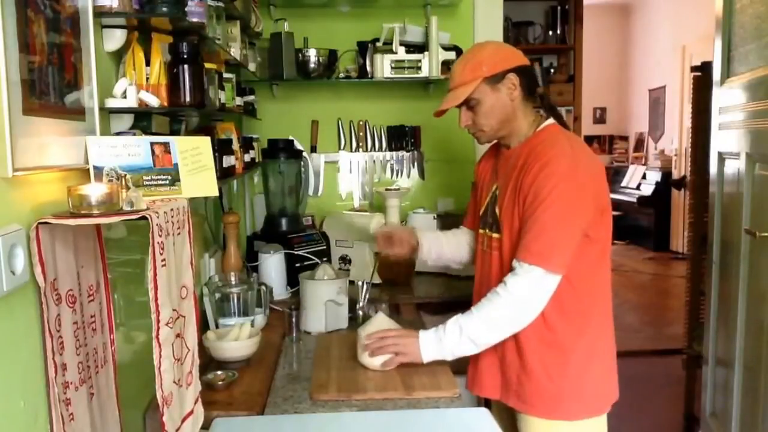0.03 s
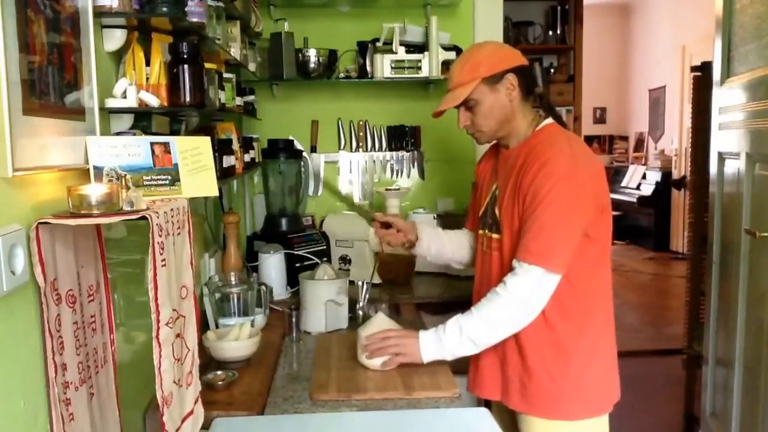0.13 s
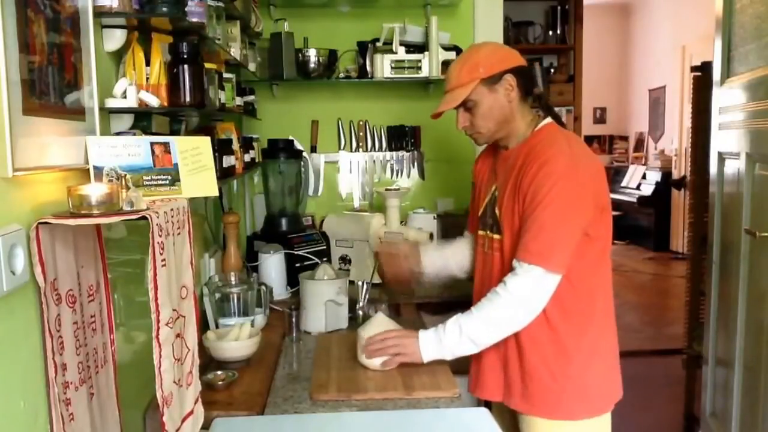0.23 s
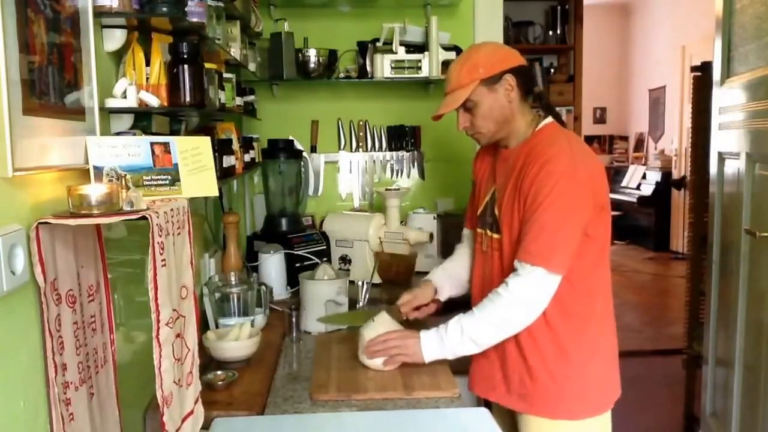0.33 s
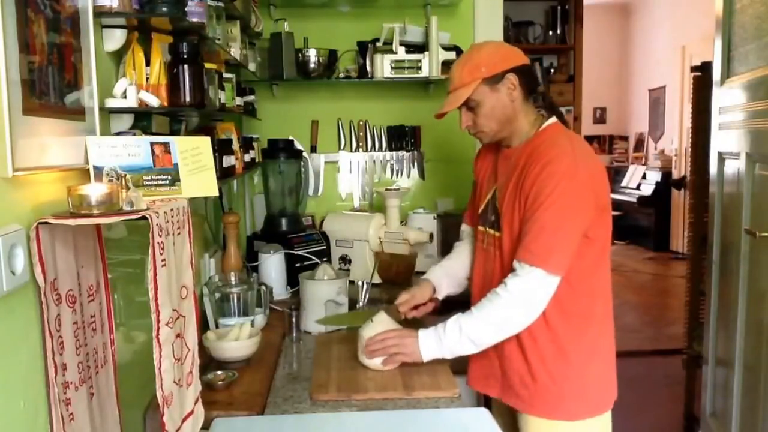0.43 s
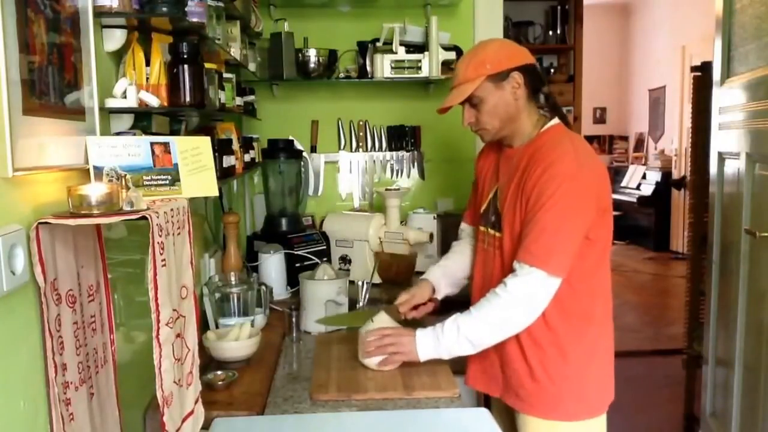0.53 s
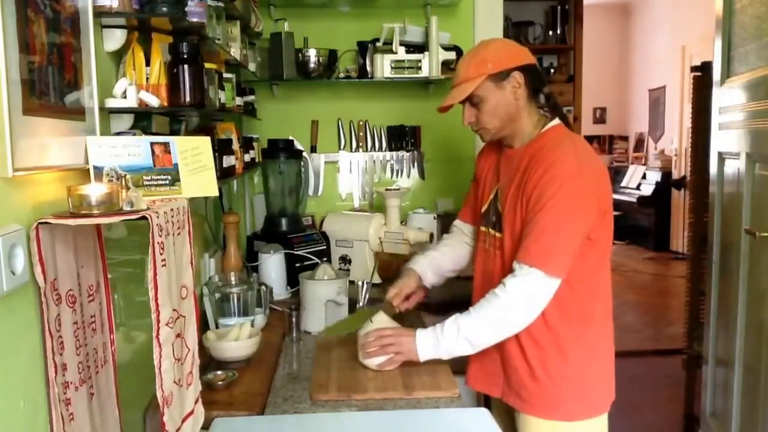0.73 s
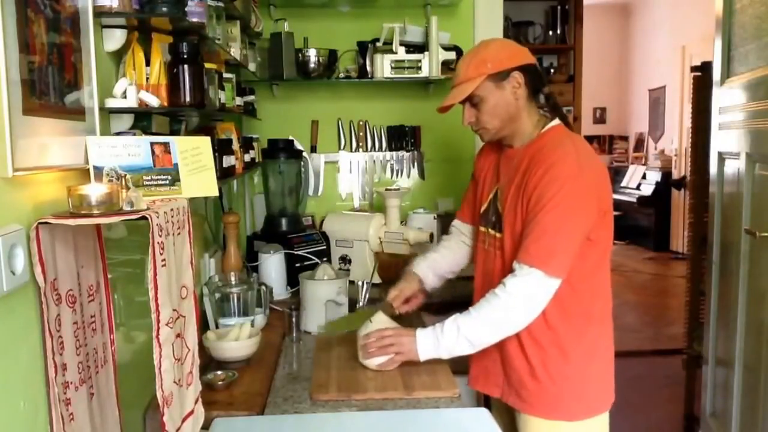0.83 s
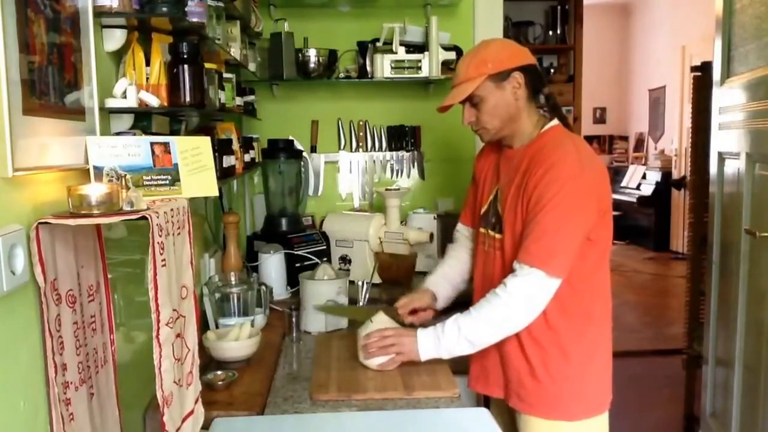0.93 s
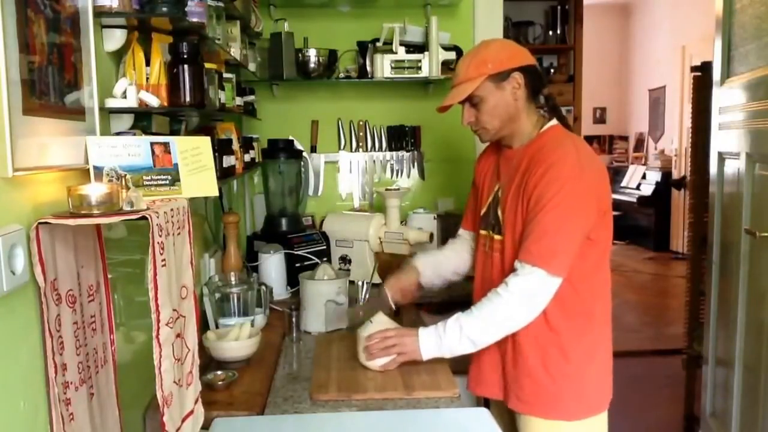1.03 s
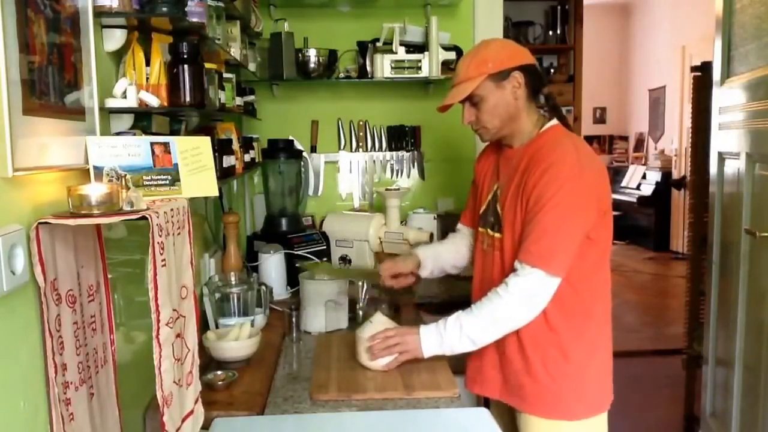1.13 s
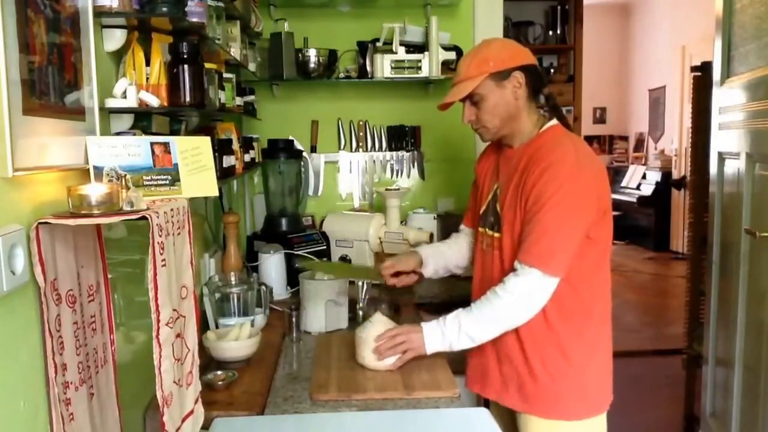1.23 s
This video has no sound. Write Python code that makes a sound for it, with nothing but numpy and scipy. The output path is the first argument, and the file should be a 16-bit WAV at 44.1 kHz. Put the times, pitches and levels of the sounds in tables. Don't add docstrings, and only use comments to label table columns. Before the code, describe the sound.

A single loud, sharp knife chop into a coconut on a wooden board, with knock and ringing board, blade and counter in a hard-walled kitchen; then very faint scraping as the blade pulls free. Small microphone, thin bass.

```python
import sys
import numpy as np
from scipy import signal
from scipy.io import wavfile

SR = 44100
rng = np.random.default_rng(int(sys.argv[2]) if len(sys.argv) > 2 else 0)


def transcribe(u):
    v = np.clip(np.atleast_2d(u).T, -1, 1)
    q = np.round(v * 32767).astype(np.int16)
    wavfile.write(sys.argv[1], SR, q)


def volts_from_db(level):
    exponent = np.asarray(level, float) / 20
    return 10 ** exponent


N = 57330
TIME = np.arange(N) / SR


def butter(x, hz, kind):
    return signal.sosfilt(signal.butter(2, hz, kind, fs=SR, output="sos"), x)


def rms_one(x):
    return x / np.sqrt(np.mean(x ** 2) + 1e-20)


def at_hz(points, hz):
    table_hz, values = np.transpose(points)
    return np.interp(np.log(hz), np.log(table_hz), values)


def ring(x, hz, t60):
    radius = volts_from_db(-60 / (t60 * SR))
    angle = 2 * np.pi * hz / SR
    feedback = [1, -2 * radius * np.cos(angle), radius * radius]
    return signal.lfilter([0, np.sin(angle)], feedback, x + 1e-18)


def decay(start, t60, rise):
    t = np.maximum(TIME - start, 0)
    return (1 - np.exp(-t / rise)) * volts_from_db(-60 * t / t60)


def bands(spectrum, white):
    edges = 40 * 2 ** np.arange(0, 8.8, 1 / 3)
    centres = np.sqrt(edges[1:] * edges[:-1])
    parts = []
    for k, hz in enumerate(centres):
        band = butter(white[k % 2], edges[k:k + 2], "band")
        parts.append(volts_from_db(at_hz(spectrum, hz)) * band)
    parts = np.array(parts)
    return centres, parts / np.std(parts.sum(axis=0))


# [t/s, crack level/dB, husk level/dB, crack length/s]
CONTACTS = [
    (0.2442, -12.5, -27, 0.0022),
    (.2460, 4, -13, 0.0023),
    (.2490, -14, -6.5, 0.002),
]
BLOW_S = CONTACTS[1][0]
# [f/Hz, level/dB, t60/s]
HUSK_MODES = [(1307, 0.5, 0.02), (1792, -6, 0.031), (4080, -9.5, 0.009), (5080, -12.5, 0.013),
              (410, -30, 0.06)]
HUSK_STRUCK = [
    [-12, 2.5, -0.5, -17.5, 2.5],
    [-28, 10.5, 9, -5, -14.5],
    [1.5, -23, -1, -3, -18],
]


def chop():
    out = np.zeros(N)
    for (s, crack_db, husk_db, length), struck in zip(CONTACTS, HUSK_STRUCK):
        noise = butter(rng.standard_normal(N), [1500, 10600], "band")
        out += 0.71 * volts_from_db(crack_db) * noise * decay(s, 5.5 * length, rise=0.00057)
        click = np.zeros(N)
        click[int(s * SR)] = volts_from_db(husk_db)
        for (hz, db, t60), struck_db in zip(HUSK_MODES, struck):
            out += volts_from_db(db + struck_db) * ring(click, hz, t60)
    return butter(out, 220, "high")


# [f/Hz, level/dB, t60/s]
BOARD_MODES = [(171, -15, 0.15), (196.8, -32, .6), (311.2, -36, 0.904), (323, -31, 0.65), (387, -23, 0.39),
               (481.6, -26, 0.63), (527, -25.5, .45), (991, -28.5, 0.44), (1179, -30, 0.28),
               (1437, -33.5, 0.81), (3510, -38, .25), (6550, -37, 0.295)]
BOARD_RISE_S = 0.011


def board():
    out = np.zeros(N)
    for hz, db, t60 in BOARD_MODES:
        tone = np.sin(2 * np.pi * (hz * (TIME - BLOW_S) + rng.random()))
        out += volts_from_db(db) * tone * decay(BLOW_S, t60, BOARD_RISE_S)
    return out


def beating(hz, db, t60, period, null, depth):
    t = TIME - null
    pair = np.exp(1j * np.pi * t / period) - depth * np.exp(-1j * np.pi * t / period)
    tone = np.real(pair * np.exp(2j * np.pi * hz * t))
    return volts_from_db(db) * tone * decay(BLOW_S, t60, BOARD_RISE_S)


def counter_and_blade():
    counter = beating(hz=156, db=-27.5, t60=0.96, period=0.32, null=0.48, depth=0.9)
    blade = beating(hz=2725, db=-25, t60=0.5, period=0.27, null=0.275, depth=0.7)
    return counter + blade


# [f/Hz, level per Hz/dB]
TAIL_COLOUR = [(60, -22.5), (160, -8.5), (400, -1.5), (637, -8.5), (1190, -3.5), (2560, -8.5), (5520, -9.5),
               (15500, -19.5)]
# [f/Hz, t60/s]
ROOM_T60 = [(100, 0.85), (260, 0.64), (700, 0.59), (1840, 0.58), (4850, 0.5), (12800, 0.32)]


def room_tail():
    start = BLOW_S + 0.0049
    centres, parts = bands(TAIL_COLOUR, rng.standard_normal((2, N)))
    out = np.zeros(N)
    for hz, part in zip(centres, parts):
        t60 = at_hz(ROOM_T60, hz)
        near = decay(start, t60, rise=0.00055 + 1.16 / hz)
        far = volts_from_db(-25.5) * decay(start, 1.77 * t60, rise=0.033)
        out += part * (near + far)
    return volts_from_db(-15) * out


# [t/s, level/dB]
SLIDE_LEVEL = [(0.188, -99), (.243, -60), (.25, -57.5), (.66, -61.5), (.75, -61), (.77, -67.5),
               (.98, -65.5), (1.03, -61.5), (1.12, -60.5), (1.17, -57.5), (1.25, -59), (1.3, -55)]
# [f/Hz, level per Hz/dB]
SLIDE_COLOUR = [(180, -43), (300, -7.5), (492, -19.5), (601, -6), (955, -6), (1100, -5.5), (2520, -10),
                (2950, -8), (12000, -20), (15600, -42), (22000, -120)]


def slide():
    grains_per_s, spread_db = 4800, 2.5
    hits = rng.random((2, N)) < grains_per_s / SR
    sizes = volts_from_db(spread_db * np.minimum(rng.exponential(1, (2, N)), 3.0))
    grains = hits * sizes * rng.choice([-1, 1], (2, N))
    rub = bands(SLIDE_COLOUR, grains + 0.72 * rng.standard_normal((2, N)))[1].sum(axis=0)
    s, db = np.transpose(SLIDE_LEVEL)
    return volts_from_db(np.interp(TIME, s, db)) * rub


# [t/s, t60/s, f/Hz, level/dB]
CREAKS = [(0.849, 0.2, 1551, -57.5), (.89, 0.23, 1017, -60), (.912, 0.17, 1460, -58.5),
          (.93, 0.15, 1010, -60), (1.0, .25, 3430, -68.5), (1.03, .3, 2620, -69), (1.03, 0.28, 6320, -67.5),
          (1.045, 0.13, 1012, -61), (1.15, 0.38, 1850, -65.5), (1.155, .3, 3740, -68),
          (1.245, 0.095, 950, -56), (1.27, .2, 950, -61), (1.275, 0.18, 2760, -61)]


def creaks():
    width_hz, roughness = 110, 1.1
    out = np.zeros(N)
    for s, t60, hz, db in CREAKS:
        tone = np.sin(2 * np.pi * hz * TIME)
        rough = rms_one(ring(rng.standard_normal(N), hz, 2.8 / width_hz))
        out += volts_from_db(db) * decay(s, t60, rise=0.0054) * (tone + roughness * rough)
    return out


# [t/s, level/dB, t60/s]
SNAPS = [(0.684, -55.5, 0.16), (.825, -58, 0.14), (1.017, -54, 0.24), (1.21, -56, 0.11)]


def snaps():
    bright = butter(rng.standard_normal(N), 3480, "high")
    return bright * sum(volts_from_db(db) * decay(s, t60, rise=0.0036) for s, db, t60 in SNAPS)


# [f/Hz, level per Hz/dB]
HISS_COLOUR = [(24, -86), (40, -44), (197, -10), (377, -19), (562, -21), (653, -24), (797, -24),
               (13300, -29.5), (15500, -31)]


def hiss():
    return volts_from_db(-64.5) * bands(HISS_COLOUR, rng.standard_normal((2, N)))[1].sum(axis=0)


def scene():
    blow = chop() + board() + counter_and_blade() + room_tail()
    pulling_free = slide() + creaks() + snaps()
    return (blow + pulling_free + hiss())[None]


def roll_off(x):
    return signal.sosfilt(signal.butter(12, 16580, fs=SR, output="sos"), x)


def record(dry):
    overload = 1.5
    thin = butter(dry, 89, "high")
    cut = signal.sosfilt(signal.cheby2(20, 55, 15480, fs=SR, output="sos"), thin)
    return roll_off(overload * np.tanh(cut / overload))


dry = scene()
out = record(dry)
transcribe(out)
```